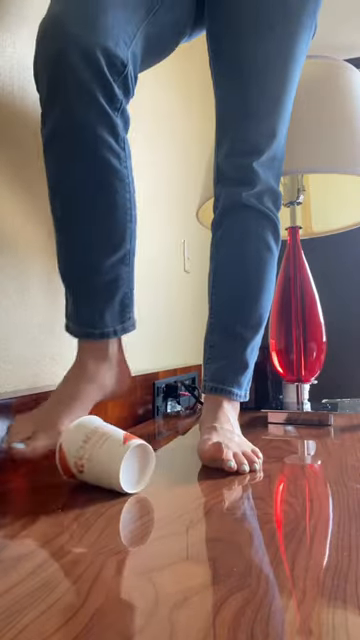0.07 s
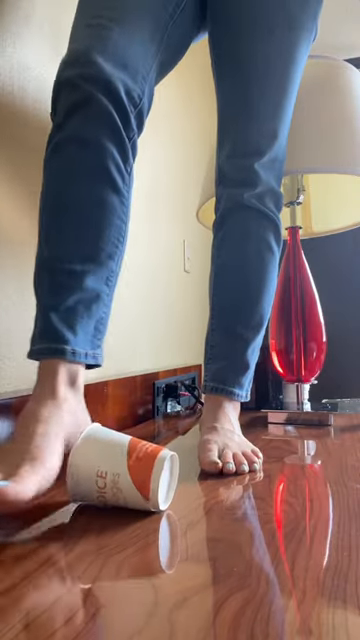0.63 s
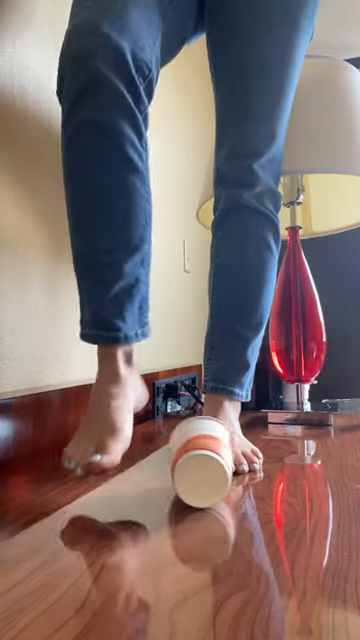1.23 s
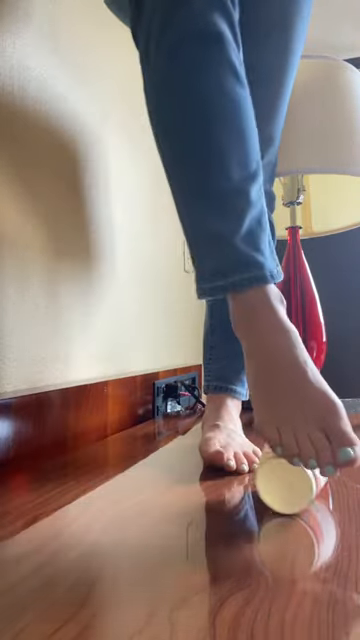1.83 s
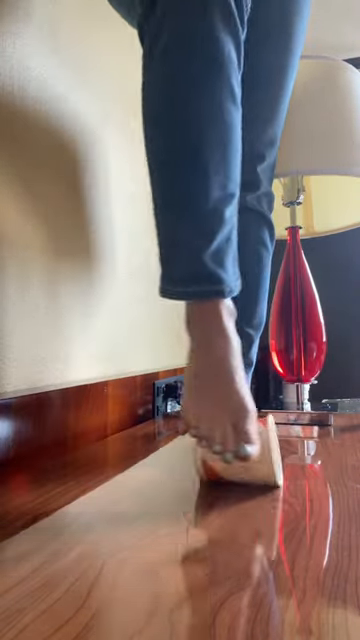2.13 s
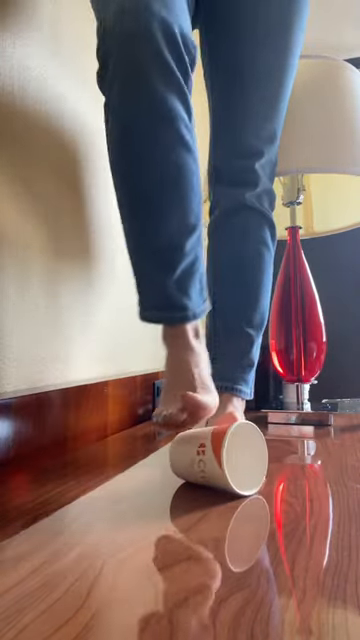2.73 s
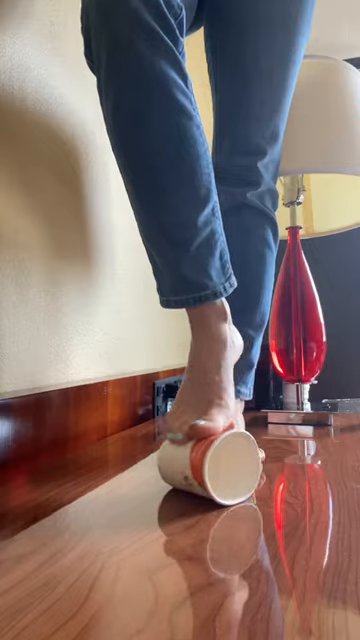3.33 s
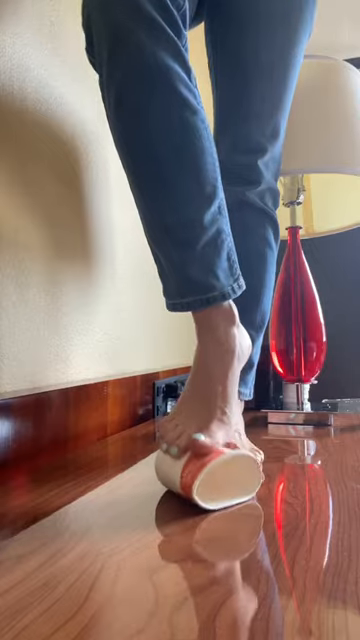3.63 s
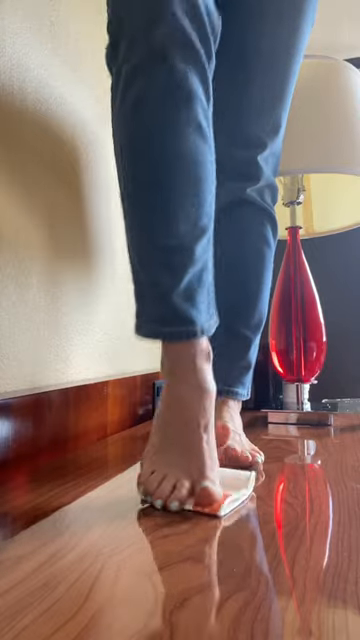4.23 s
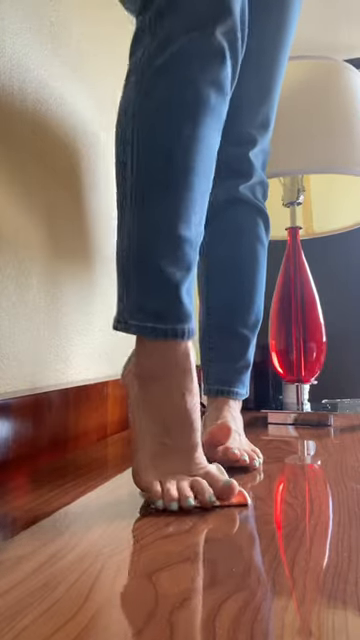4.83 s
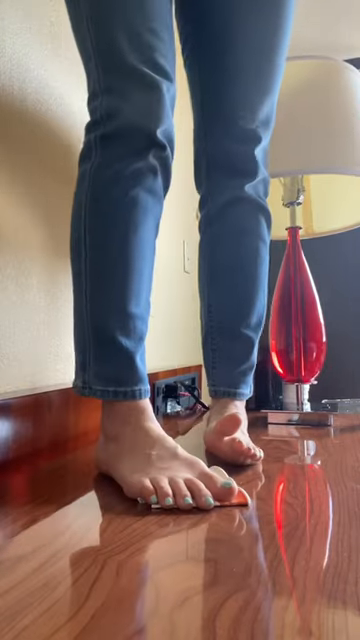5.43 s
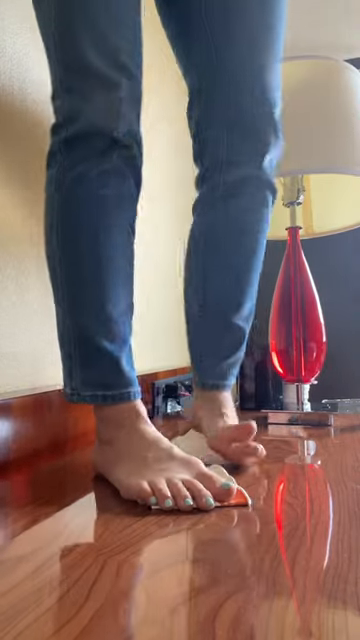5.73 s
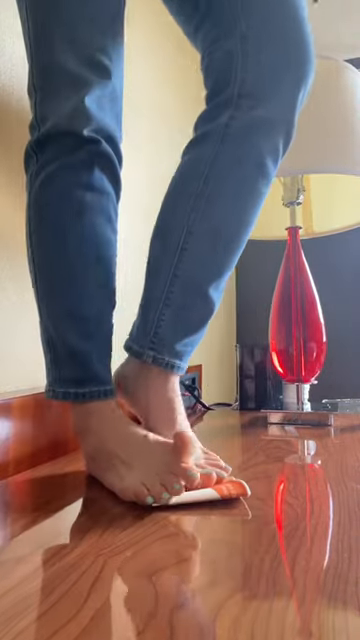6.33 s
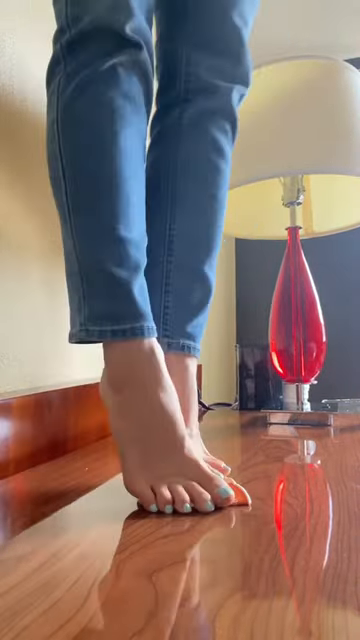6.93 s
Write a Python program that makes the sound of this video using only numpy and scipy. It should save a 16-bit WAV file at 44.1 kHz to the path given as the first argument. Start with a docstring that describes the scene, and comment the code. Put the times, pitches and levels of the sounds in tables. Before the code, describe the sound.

In a small, echoing room with a low ventilation hum, skin rubs softly on a paper cup, which knocks lightly as it rolls. Then the foot presses down: a hollow pop, a loud crackling crunch, and several separate snaps as the cup flattens. The wooden floor thuds and rumbles faintly under the weight, and the paper is ground down at the end. Two closely spaced microphones pick it up.

```python
"""Crushing a paper cup underfoot

A bare foot rolls a paper cup over a hard wooden floor, then stands on it. The cup's wall pops in,
folds with a loud crunch and snaps once more when flat. Creases crackle as fibres break, skin rubs
on paper, and the sole grinds the cup down while the floorboards thud and flex.
Ventilation hums in the small, echoing room, heard by two microphones close together."""
import sys
import numpy as np
from scipy import signal
from scipy.fft import rfft, irfft
from scipy.io import wavfile
from scipy.ndimage import uniform_filter1d

SR = 44100
rng = np.random.default_rng(int(sys.argv[2]) if len(sys.argv) > 2 else 0)


def unload_wav(signal):
    """Save mono or channel-first audio to the path in sys.argv[1] as 16-bit WAV at rate SR, clipped to [-1, 1]."""
    wavfile.write(
        sys.argv[1],
        SR,
        np.round(np.clip(np.atleast_2d(signal).T, -1, 1) * 32767).astype(np.int16),
    )


N = 311787


def amp(db):
    """Turns decibels into a gain."""
    return 10 ** (np.asarray(db) / 20)


def unit(x):
    """Scales a signal to an average power of 1."""
    return x / np.sqrt(np.mean(x ** 2) + 1e-20)


def curve(points, hz):
    """Joins a table's points by straight lines on a log-frequency axis."""
    f, value = np.transpose(points)
    return np.interp(np.log(hz + 1), np.log(f + 1), value)


def freqs(size):
    """The frequencies in the spectrum of this many samples."""
    return np.fft.rfftfreq(size, 1 / SR)


def add(mix, s, sound):
    """Mixes a sound in, starting at s seconds."""
    part = mix[round(s * SR):][:len(sound)]
    part += sound[:len(part)]


def tone_filter(gain_db, size=2048):
    """The shortest filter whose spectrum follows gain_db(hz)."""
    log_gain = np.log(amp(np.maximum(gain_db(freqs(size)), -100)))
    mirrored = np.r_[log_gain, log_gain[-2:0:-1]]
    return np.fft.ifft(np.exp(np.conj(signal.hilbert(mirrored)))).real


def through(x, response):
    """Filters x without changing the power of white noise."""
    return signal.oaconvolve(x, response / np.linalg.norm(response))[:N]


def at_level(x, db, seconds=0.0024945):
    """Gives a short sound the energy of a steady one lasting this long at db."""
    return amp(db) * x / np.sqrt(np.sum(x ** 2) / (seconds * SR) + 1e-20)


def spray(decay_s):
    """A cluster of tiny clicks that swells and dies quickly, equally strong at all pitches."""
    decay = max(decay_s, .0002) * SR
    age = np.arange(int(10 * decay) + 8) / decay
    burst = np.sqrt(age) * np.exp(-age) * rng.standard_normal(len(age))
    spectrum = rfft(burst, 4 * len(burst))
    return irfft(spectrum / abs(spectrum))[:len(burst)]


def grains(per_s, spread_db):
    """Random little slips, a few much larger than the rest."""
    sizes = amp(spread_db * np.minimum(rng.exponential(1, N), 4))
    signs = rng.choice([-1, 1], N)
    return unit(sizes * signs * (rng.random(N) < per_s / SR))


def ring(modes, size=6000):
    """Tones that each fade by 60 dB in their ring time; neighbours swing in opposite directions."""
    t = np.arange(size) / SR
    return sum((-1) ** k * amp(db - 60 * t / t60) * np.sin(2 * np.pi * hz * t)
               for k, (hz, db, t60) in enumerate(modes))


def swell(peak_s, width_s, release=1.062):
    """The force of one press: a smooth rise and a slightly slower release."""
    u = (np.arange(N) / SR - peak_s) / width_s
    u = np.where(u < 0, u, u / release)
    return 1 / np.cosh(np.clip(u, -20, 20)) ** 2


# How alike sound from all around is at the two microphones: f/Hz, likeness/0-1
LIKENESS = [(280, 1), (310, 0.8), (650, 0.87), (1300, 0), (2000, 0.5), (3000, 0.5), (4000, 0.09), (5300, 1)]
def diffuse(spectra, hz):
    """Blends two unrelated spectra into a left and a right that are partly alike."""
    alike = np.clip(curve(LIKENESS, hz), 0, 1)
    same = np.sqrt((1 + alike) / 2) * spectra[0]
    apart = np.sqrt((1 - alike) / 2) * spectra[1]
    return np.array([same + apart, same - apart])


# The tone of the moving air: f/Hz, relative level/dB
AIR_TONE = [(25, -35), (44, -1), (80, 0), (105, -12), (230, -3), (310, -8.5), (530, -13), (700, -9.5),
            (1000, -9), (1400, -17.5), (2100, -13.5), (4400, -30.5), (7500, -41), (14000, -73)]
# The ventilation's hums: f/Hz, width/Hz, level/dB
AIR_HUMS = [(120.16, 6.336, -52.5), (147.19, 25.42, -49.5)]
def ventilation(rush_db=-44.5):
    """A steady rush of air with two narrow, wavering hums."""
    hz = freqs(N)
    noise = diffuse(rfft(rng.standard_normal((2, N))), hz)
    air = amp(rush_db) * unit(irfft(noise * amp(curve(AIR_TONE, hz)), N))
    for centre, width, db in AIR_HUMS:
        band = rfft(rng.standard_normal(N)) / (1 + (2 * (hz - centre) / width) ** 2)
        air += amp(db) * unit(irfft(band, N))
    return air


# How long the room takes to fade by 60 dB: f/Hz, ring time/s
TAIL_TIMES = [(150, 0.3675), (500, 0.3609), (1300, 0.5), (3500, .5), (8000, 0.4477), (13000, 0.3321)]
# Tone of the echoing tail, with its top treble cut: f/Hz, level/dB
TAIL_TONE = [(150, -0.5), (450, -8), (680, -10), (830, -2.5), (1000, -10), (1400, -7), (2100, -4),
             (2800, -3), (3250, -5), (3700, -9.5), (4700, -5.5), (6000, -5.5), (8000, -7.5), (12500, -10),
             (15000, -19.5)]
def room_tail(x, gap_s=0.0024185, build_s=0.0025, corner_db=3, corner_s=0.021):
    """The room rings on and dies away band by band; the near corner strengthens the start."""
    hz, t, noise = signal.stft(rng.standard_normal((2, SR)), SR, nperseg=256)
    t60 = curve(TAIL_TIMES, hz)[:, None]
    corner_lift = corner_db * (np.exp(-t / corner_s) - .5)
    level_db = curve(TAIL_TONE, hz)[:, None] - 60 * t / t60 + corner_lift
    equal_energy = np.sqrt(2 * np.log(1000) / (t60 * SR))
    bands = diffuse(noise, hz[:, None]) * amp(level_db) * equal_energy
    tail = signal.istft(bands, SR, nperseg=256)[1]
    tail *= np.clip((np.arange(tail.shape[1]) / SR - gap_s) / build_s, 0, 1)
    return signal.fftconvolve(x[None], tail, axes=1)[:, :N]


# Notes the boards and the room favour: f/Hz, peak level against the direct sound/dB, ring time/s
ROOM_NOTES = [(412.48, 2.5, 0.33), (568.78, -5.5, .3), (657.3, -4, 0.49), (732.24, 3.5, 0.47),
              (819.07, 4, 0.48), (892.65, -2, 0.37), (1011.2, -4, 0.31), (1138.4, 0, .27),
              (1240.5, -1, 0.3), (1486.9, -5.5, 0.5), (1869, 4, .7), (2414, 3, 1), (2606.5, 3, 0.74)]
def room_ring(x):
    """The boards and things in the room sing on after each blow."""
    t = np.arange(SR) / SR
    notes = sum(amp(db - 60 * t / t60) * np.cos(2 * np.pi * hz * t) * 2 * np.log(1000) / (t60 * SR)
                for hz, db, t60 in ROOM_NOTES)
    return signal.fftconvolve(x, notes)[:N]


# Single early echoes: delay/s, f/Hz, half width/octaves, level/dB
WALL_ECHOES = [(.0085, 7000, 1.4, -21), (.0155, 950, .5, -15.5), (.028, 420, 0.3724, -15),
               (.05, 797.3, 0.2095, -16.5)]
def echoes(x):
    """Nearby walls and furniture each throw back one band of the sound."""
    out = np.zeros(N)
    for delay, centre, octaves, db in WALL_ECHOES:
        band = tone_filter(lambda hz: db - 20 * np.log10(1 + (np.log2((hz + 1) / centre) / octaves) ** 4))
        add(out, delay, signal.oaconvolve(x, band))
    return out


# The first reflections compared with the direct sound: f/Hz, level/dB
SCATTER_TONE = [(80, -23.5), (250, -4), (500, -10), (1000, -26.5), (2200, -5.5), (4000, -9.5), (5500, -18),
                (8000, -14.5), (13000, -16.5)]
def floor_scatter(x, decay_s=0.002264):
    """Floor and skirting board scatter the sound within a few milliseconds and widen it."""
    bounces = spray(decay_s)
    colour = tone_filter(lambda hz: curve(SCATTER_TONE, hz))
    response = signal.fftconvolve(bounces / np.linalg.norm(bounces), colour)
    return np.outer([1, -1], signal.fftconvolve(x, response)[:N])


# How much louder the cup is on the left: f/Hz, level/dB
LEFT_LIFT = [(300, 2.5), (680, -5), (1250, -0.5), (2200, 4.5), (4200, 3), (8000, 0)]
# How far its wave is ahead on the left: f/Hz, phase/radians
LEFT_LEAD = [(300, -0.8879), (700, 0.9946), (1030, 1.5), (2070, -0.5), (2580, 0), (3530, 3.5),
             (3960, 2.0638), (4800, -0.307), (8000, -0.1004), (13000, -0.5)]
def direct_sound(x):
    """The cup's panels send sound out unevenly, so each pitch leans a little to one side."""
    hz, side = freqs(N), np.array([[.5], [-.5]])
    gain = amp(side * curve(LEFT_LIFT, hz))
    phase = np.exp(1j * side * curve(LEFT_LEAD, hz))
    return irfft(rfft(x) * gain * phase, N)


# The foot leans on the cup and eases off (this also drives skin_scuffs and sole_grind):
# peak t/s, half width/s, skin hiss level/dB, paper grinding level/dB
FOOT_PRESSES = [(3.015, 0.036, -59, -76.5), (3.91, 0.09607, -54.5, -72), (4.111, 0.03283, -38, -51.5),
                (4.375, 0.07362, -62.5, -45.5), (4.65, 0.1639, -62, -72), (5.205, 0.07725, -51.5, -50.5),
                (5.71, 0.0834, -60, -55), (5.967, 0.0366, -53.5, -57), (6.125, 0.028, -72.5, -39),
                (6.27, 0.05935, -59.5, -57), (6.891, 0.06532, -57, -37.5), (6.969, 0.05085, -47.5, -33)]
# The tone of the bending boards: f/Hz, relative level/dB
FLEX_TONE = [(25, -30), (42, -4.5), (80, -2.5), (130, -7), (190, -16), (400, -34.5), (1500, -61.5)]
def floor_flex(flex_db=-44.5, at_grind_db=-47.5, slope=0.2882, lag_s=0.07, widen_s=0.12738):
    """The floor bends with a low rumble after each press, more slowly and evenly than the foot."""
    power = sum((amp(flex_db + slope * (db - at_grind_db)) * swell(s + lag_s, width + widen_s)) ** 2
                for s, width, _, db in FOOT_PRESSES)
    rumble = irfft(rfft(rng.standard_normal(N)) * amp(curve(FLEX_TONE, freqs(N))), N)
    return np.sqrt(power) * unit(rumble)


# The tone of the struck boards: f/Hz, relative level/dB
THUD_TONE = [(30, -5.5), (60, -4), (100, 6), (200, 1.5), (310, 1.5), (480, -1), (800, -10.5), (1300, -4),
             (3000, -10.5), (12000, -16)]
def thud(db, top_hz, band_ratio=3.638, decay_cycles=2.5):
    """One dull blow on the boards; the lower it is, the longer it lasts."""
    low_hz = top_hz / band_ratio
    band = lambda hz: -10 * np.log10((1 + (hz / top_hz) ** 4) * (1 + (low_hz / (hz + 1)) ** 4))
    colour = tone_filter(lambda hz: curve(THUD_TONE, hz) + band(hz), size=4096)
    return at_level(signal.fftconvolve(spray(decay_cycles / top_hz), colour), db, seconds=0.006186)


# Blows on the floor: t/s, level/dB, highest strong f/Hz
FLOOR_BUMPS = [(.288, -39.5, 55.25), (3.645, -34, 1201), (4.084, -41, 170), (4.124, -30, 171.4),
               (4.328, -35.5, 197.8), (4.38, -42.5, 130), (4.44, -39, 129.9), (5.263, -34, 640),
               (5.631, -39.5, 1581), (5.648, -35.5, 456), (5.688, -29, 350), (5.779, -41, 50),
               (6.127, -28, 1284), (6.345, -38, 200), (6.592, -37.5, 400), (7.005, -30.5, 1181),
               (7.045, -29.5, 1001)]
def floor_bumps():
    """The foot and the cup bump the boards."""
    out = np.zeros(N)
    for s, db, top_hz in FLOOR_BUMPS:
        add(out, s, thud(db, top_hz))
    return out


# Knocks of the rolling cup: t/s, level/dB
CUP_KNOCKS = [(1.8235, -35.5), (1.981, -40.5), (2.005, -34.5)]
# The hollow cup's notes: f/Hz, relative level/dB, ring time/s
HOLLOW_NOTES = [(693.63, 4.5, 0.11), (772.38, -6.5, 0.329), (1151.7, -12.5, 0.04114)]
def cup_knocks():
    """Soft knocks ring the still hollow cup as it rolls."""
    out = np.zeros(N)
    for s, db in CUP_KNOCKS:
        knock = signal.fftconvolve(spray(decay_s=0.0025), ring(HOLLOW_NOTES))
        add(out, s, at_level(knock, db, seconds=0.00401))
    return out


def rasp(slips, hz, width_hz=1100, wander=0.028):
    """A broad resonance whose pitch wanders as the skin slides."""
    drift = unit(uniform_filter1d(rng.standard_normal(len(slips)), size=1500))
    carrier = np.exp(2j * np.pi * np.cumsum(hz * (1 + wander * drift)) / SR)
    # Shift the pitch down to zero, smooth, and shift back: only the band around it is left.
    pole = np.exp(-np.pi * width_hz / SR)
    smoothed = signal.lfilter([1], [1, -2 * pole, pole * pole], slips / carrier)
    return unit((carrier * smoothed).real)


# Skin touches the paper and slips off: t/s, level/dB, rise/s, decay/s, rasp share/0-1, rasp f/Hz
SKIN_TOUCHES = [(.176, -54.5, 0.002893, 0.1334, 0.34, 7036), (.18, -62.5, 0.0205, 0.0827, 0.71, 4151),
                (0.842, -57, 0.00573, 0.0944, 0.31, 4249), (.86, -56.5, 0.07776, 0.06223, 0.37, 5391),
                (0.869, -59.5, 0.0812, 0.0518, 0.57, 4306), (1.813, -46, 0.00298, 0.0404, 0, 3300),
                (1.895, -53.5, 0.002924, 0.05723, .1, 8065), (1.98, -45, 0.001008, 0.01058, 0.86, 3365),
                (1.995, -47, 0.002993, 0.07573, 0, 7140), (2.94, -52, .003, 0.00978, 0.1, 4298),
                (3.311, -58.5, 0.00297, 0.082, 0, 4300), (3.596, -54.5, .003, 0.1794, 0.17, 3909),
                (4.408, -46.5, 0.007, 0.04952, 0.08, 3738)]
# The tone of rubbing skin: f/Hz, relative level/dB
SKIN_TONE = [(300, -9.5), (1500, -2.5), (4000, -6.5), (5500, -5), (7800, -5.5), (9500, -10), (12500, -21.5),
             (15000, -32)]
def skin_scuffs():
    """Fine, dense friction hisses under each press and touch; sliding skin also rasps."""
    t = np.arange(SR) / SR
    hiss_power = sum((amp(db) * swell(s, width)) ** 2 for s, width, db, _ in FOOT_PRESSES)
    rasps = np.zeros(N)
    for s, db, rise, decay, share, rasp_hz in SKIN_TOUCHES:
        level = amp(db) * np.minimum(t / rise, 1) * np.exp(-np.maximum(t - rise, 0) / decay)
        add(hiss_power, s, level ** 2)
        slips = grains(per_s=1500, spread_db=2.5)[:SR]
        add(rasps, s, level * np.sqrt(share) * rasp(slips, rasp_hz))
    friction = np.sqrt(hiss_power) * grains(per_s=3000, spread_db=3.5)
    return rasps + through(friction, tone_filter(lambda hz: curve(SKIN_TONE, hz)))


# Notes of the paper pressed on the boards: f/Hz, relative level/dB, ring time/s
GRIND_NOTES = [(119.03, -10, 0.08), (300.71, 0, 0.03245), (416.15, -2.5, 0.0474), (513.94, -1, 0.035),
               (764.4, 0, 0.03), (840.16, -3, 0.06321), (1178, -1.5, 0.0485), (1639.1, -5, .018),
               (2324, -8.5, 0.0071), (3462.2, -11, 0.0092)]
def sole_grind():
    """Coarse sticking and slipping rings the pressed paper and the boards under it."""
    pressure = sum(amp(db) * swell(s, width) for s, width, _, db in FOOT_PRESSES)
    return through(pressure * grains(per_s=700, spread_db=1), ring(GRIND_NOTES))


# Moments of strain in the cup's wall: peak t/s, half width/s, level/dB
WALL_STRAINS = [(4.1, 0.016, -43), (4.128, 0.01, -36), (4.155, 0.018, -47), (4.33, 0.087, -54),
                (4.925, 0.024, -44), (5.628, 0.012, -53.5), (5.71, 0.043, -52.5), (5.965, 0.032, -49),
                (6.007, 0.015, -40), (6.965, 0.06, -49)]
# Small patches of the crumpled wall: f/Hz, relative level/dB, ring time/s
WALL_PATCHES = [(1500, -7, .014), (1977, 3, 0.013), (2507.6, -8, 0.0087), (2863.2, -1.5, .008),
                (3199, -2.5, 0.0033), (3684, -3.5, 0.0044), (4447.3, 1, 0.004506), (6200, -4.5, .002)]
def crinkle():
    """Clouds of tiny creases form under strain; each rings one patch of the wall."""
    strain = sum(amp(db) * swell(s, width) for s, width, db in WALL_STRAINS)
    ticks = sum(amp(db) * through(grains(per_s=260, spread_db=3.0), ring([(hz, 0, t60)]))
                for hz, db, t60 in WALL_PATCHES)
    return strain * unit(ticks)


# The tone of cracking paper: f/Hz, relative level/dB
PAPER_TONE = [(100, -49), (400, -5), (900, -8), (1500, -6.5), (2400, -3.5), (3100, -4), (3900, -6.5),
              (4700, -1), (6200, 0.5), (10000, -10), (12500, -13.5), (15000, -16)]
# Resonances of a bent panel: multiple of ring_hz, width/Hz, lift at stiffness 1/dB
PANEL_PEAKS = [(.27, 400, 5), (.49, 300, 2.5), (.76, 400, 3.5), (1, 450, 14.5), (1.58, 600, -1),
               (1.92, 700, 4.5), (2.35, 600, 2.5), (2.72, 800, 7)]
def crack(db, tilt_db, ring_hz=3250, top_hz=14000, stiffness=0.8269, scatter=0.017):
    """One paper crack: a spray of fibre breaks, coloured by the paper and a bent panel."""
    detunes = 1 + scatter * rng.standard_normal(len(PANEL_PEAKS))

    def colour_db(hz):
        panel = sum(lift / (1 + (2 * (hz - ring_hz * ratio * detune) / width) ** 2)
                    for (ratio, width, lift), detune in zip(PANEL_PEAKS, detunes))
        treble_cut = 10 * np.log10(1 + (hz / top_hz) ** 16)
        tilt = tilt_db * np.log2((hz + 200) / 4000)
        return curve(PAPER_TONE, hz) + stiffness * panel - treble_cut + tilt

    decay_s = 0.0007687 * 2 ** ((db + 35.5) / 27.5)  # a bigger crease takes longer to break
    return at_level(signal.fftconvolve(spray(decay_s), tone_filter(colour_db)), db)


# Sharp paper cracks, one followed by its quick echo:
# t/s, level/dB, treble tilt/dB per octave, panel f/Hz, top f/Hz
SHARP_CRACKS = [(1.9793, -31, -1, 3352, 8756), (3.6444, -20, 0.5, 3770, 11700),
                (3.877, -44.5, 9, 4203, 14100), (3.8885, -28.5, 3, 3635, 13230),
                (4.083, -27.5, 5.5, 2983, 15000), (4.0978, -31, 1, 3400, 13000),
                (4.109, -34, -3.5, 3200, 9000), (4.1175, -20.5, -0.5, 3650, 12100),
                (4.1266, -25, -5, 3100, 6046), (4.132, -18.5, -7.5, 2486, 4500),
                (4.1349, -22.5, 0.5, 3645, 5000), (4.1463, -30.5, -8.5, 2500, 4496),
                (4.2084, -33, 6, 3786, 13890), (4.8998, -21, 5, 4248, 10580), (4.9, -30, -0.5, 1759, 2897),
                (4.9077, -30.5, 1.5, 2835, 5240), (5.8068, -44.5, 5, 3966, 15000),
                (5.8674, -40.5, -2.5, 3800, 14000), (5.9851, -21.5, 5, 3633, 15000),
                (6.841, -41.5, -1, 3810, 14010), (6.9205, -23, 0, 3463, 15000),
                (7.044, -39, -7, 3556, 12000)]
def sharp_cracks(wait_s=0.013, settle_db=-19.5, loss_db=4):
    """The paper cracks sharply as it creases; each crack trails off in four ever smaller ticks."""
    out = np.zeros(N)
    for s, db, tilt_db, ring_hz, top_hz in SHARP_CRACKS:
        add(out, s, crack(db, tilt_db, ring_hz, top_hz))
        delays = np.cumsum(wait_s * (.5 + rng.random(size=4)))
        for k, delay in enumerate(delays):
            tick_hz = ring_hz * rng.uniform(0.94, 1.9)
            add(out, s + delay, crack(db + settle_db - k * loss_db, tilt_db, tick_hz, top_hz))
    return out


# Runs of ticks: t/s, length/s, first gap/s, gap growth factor (below 1 counts as 1), first level/dB,
# step per tick/dB, treble tilt/dB per octave, thud level against the tick/dB
FOLD_RUNS = [(3.8123, .064, 0.020143, 1.0, -43.5, 2, 7.5, -9.5),
             (4.095, .016, 0.005494, 0.84, -40, 3, -0.5, -6),
             (4.4123, .012, .0045, 1.0, -37.5, 0, -5.5, -18.5),
             (5.6859, .078, 0.010883, 1.12, -29.5, -2.1064, -6.5, 0)]
def folds():
    """A fold travels through the paper in a run of ticks that also shake the boards."""
    out = np.zeros(N)
    for start, length, gap, growth, db, step_db, tilt_db, thud_db in FOLD_RUNS:
        s = start
        while s < start + length:
            add(out, s, crack(db, tilt_db))
            add(out, s, thud(db + thud_db, top_hz=576))
            s += gap
            gap *= max(growth, 1)
            db += step_db
    return out


# The cup's notes when round, folded and flat: f/Hz, relative level/dB, ring time/s
CUP_NOTES = {"round": [(312.33, 2.5, 0.013715), (454.05, 2, 0.02928), (582.56, -6, 0.0744),
             (720, 4.5, 0.01), (971.9, 4.5, 0.028924), (1207.2, -0.5, 0.015), (2850, -17.5, 0.016)],
             "folded": [(252, -16, 0.012), (484.15, -12, 0.027), (693.24, 1, 0.024115),
             (826.44, 3.5, 0.015373), (1088.6, 1.5, 0.01796), (1557.1, 1.5, 0.01779), (1950.5, -5, 0.018),
             (2410.5, -3.5, 0.01613), (3578.6, 4.5, 0.014), (3887.8, 2, 0.01134)],
             "flat": [(1120, -5, 0.026), (1228.2, 4, 0.018), (1508.3, 1.5, 0.012), (2009.4, 0.5, 0.013),
             (2750.8, -2, 0.012), (3161.4, -2, 0.004933), (3722.2, 1, 0.0058), (6312, 3, 0.001655)]}
# The wall caves in: t/s, level/dB, push rise time/s, tearing level/dB, shape of the cup
WALL_BUCKLES = [(3.5732, -19.5, 0.0000653, -68, "round"), (3.5753, -9.5, 0.0001092, -64.5, "round"),
                (4.0903, -32.5, 0.00051, -39, "folded"), (4.1086, -28.5, 0.0002482, -32, "folded"),
                (4.1195, -25.5, 0.00067, -31, "folded"), (4.1262, -13, 0.0007203, -40, "folded"),
                (4.1369, -4.5, 0.0000695, -22.5, "folded"), (4.1397, -12, 0.000132, -22, "folded"),
                (5.9849, -14, 0.0000117, -18.5, "flat")]
def buckles():
    """The wall snaps through: a short push rings the cup while fibres tear."""
    out = np.zeros(N)
    for s, db, push_s, tear_db, shape in WALL_BUCKLES:
        age = np.arange(400) / (push_s * SR)
        push = age * np.exp(-age)
        add(out, s, at_level(signal.fftconvolve(ring(CUP_NOTES[shape]), push), db))
        add(out, s, crack(tear_db, tilt_db=-0.5, ring_hz=3725.2, top_hz=11877, stiffness=0.61))
    return out


def scene():
    """The foot crushes the cup in the room, over the rumble of the floor and the ventilation."""
    paper = buckles() + sharp_cracks() + folds() + crinkle()
    crush = paper + floor_bumps() + cup_knocks() + skin_scuffs() + sole_grind()
    room = room_tail(crush) + floor_scatter(crush) + echoes(crush) + room_ring(crush)
    return direct_sound(crush) + room + floor_flex() + ventilation()


def record(dry, left_lag_samples=4, ceiling=0.9938, top_hz=14900):
    """The left side arrives slightly late, the tallest peaks are rounded and the top treble is cut."""
    left = np.r_[np.zeros(left_lag_samples), dry[0, :-left_lag_samples]]
    pair = np.array([left, dry[1]])
    rounded = pair / (1 + (pair / ceiling) ** 6) ** (1 / 6)
    lowpass = signal.firwin(101, top_hz, window=("kaiser", 9), fs=SR)
    return signal.oaconvolve(rounded, lowpass[None], "same")


dry = scene()
out = record(dry)
unload_wav(out)
```